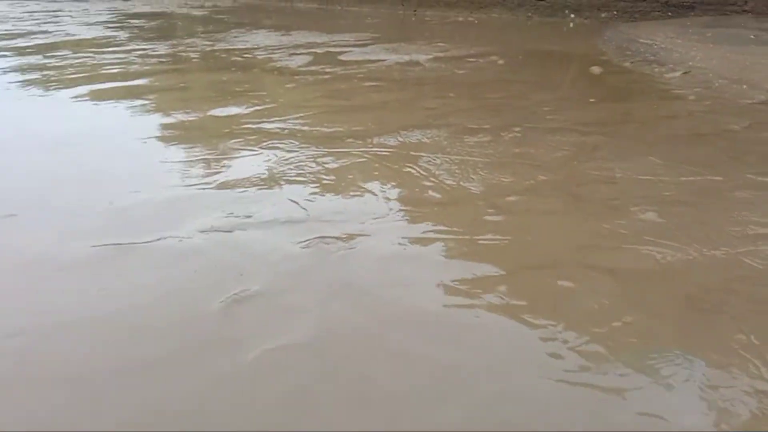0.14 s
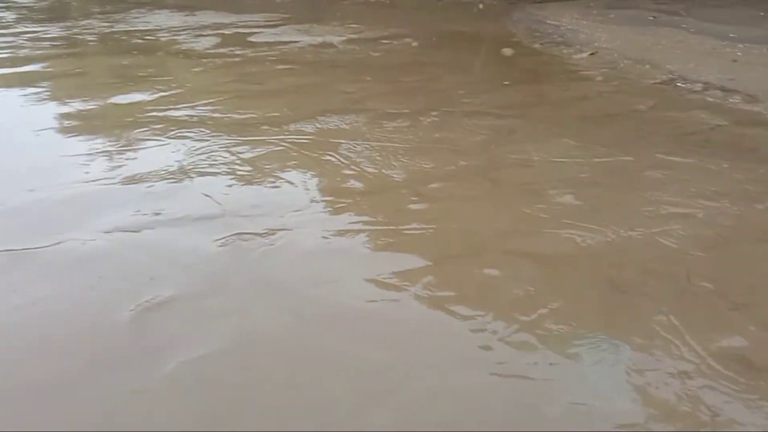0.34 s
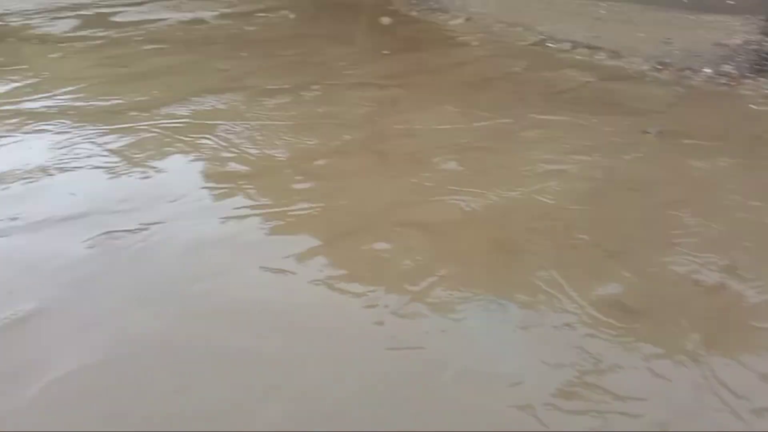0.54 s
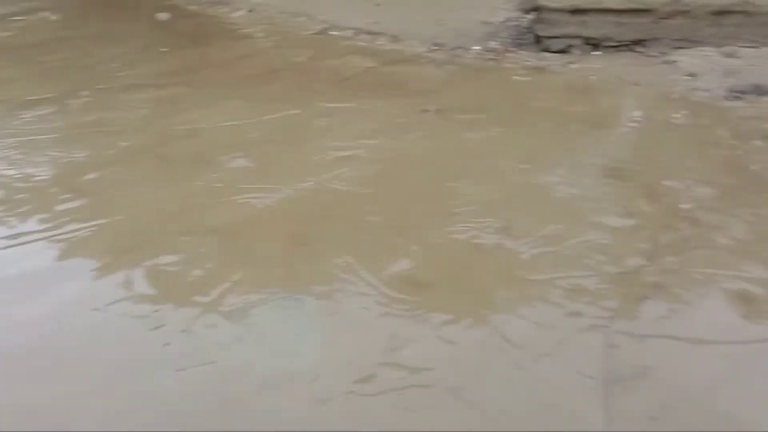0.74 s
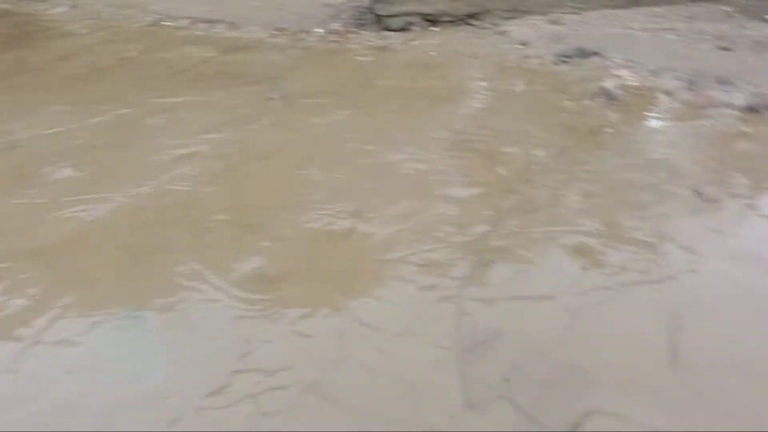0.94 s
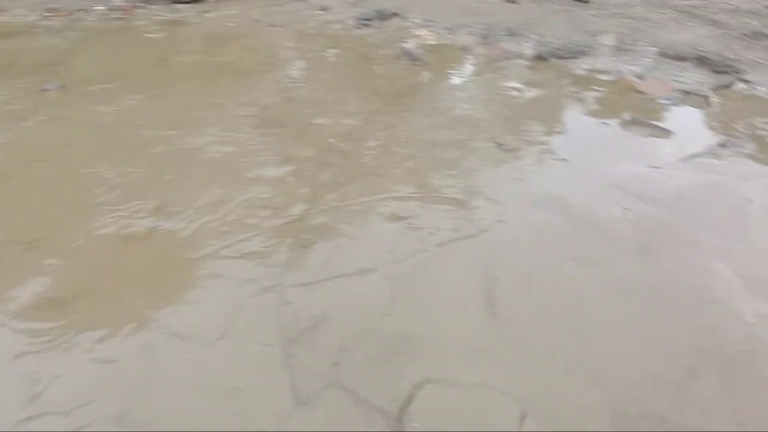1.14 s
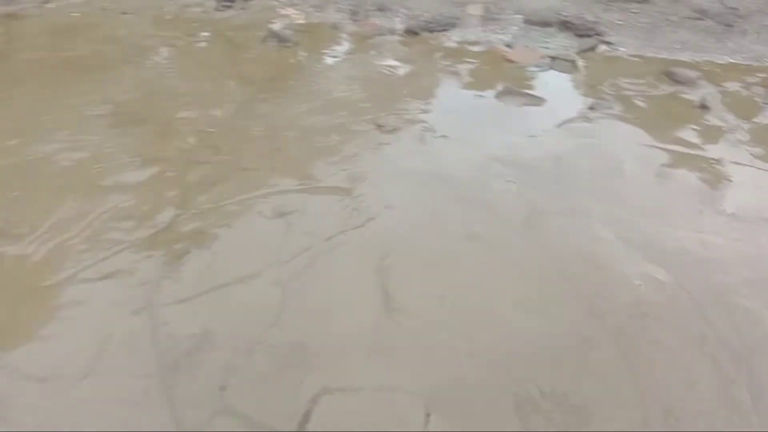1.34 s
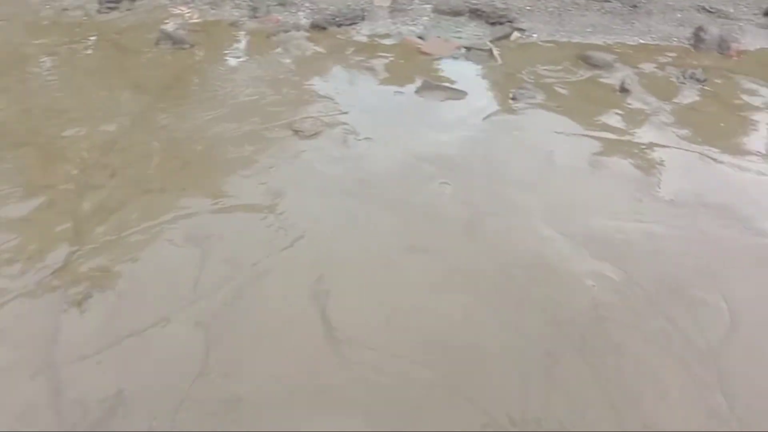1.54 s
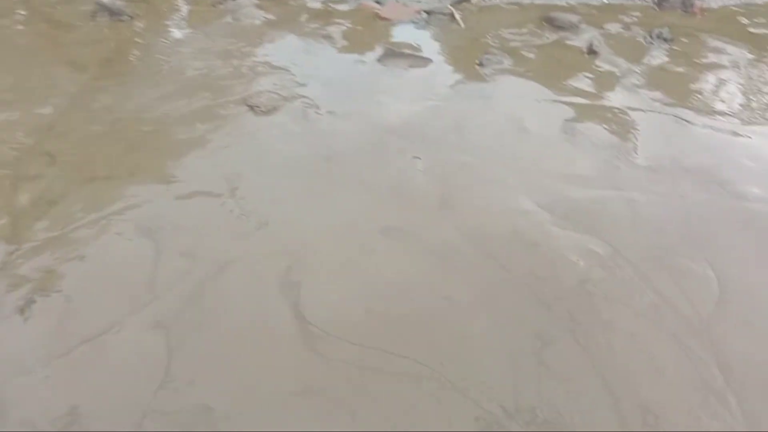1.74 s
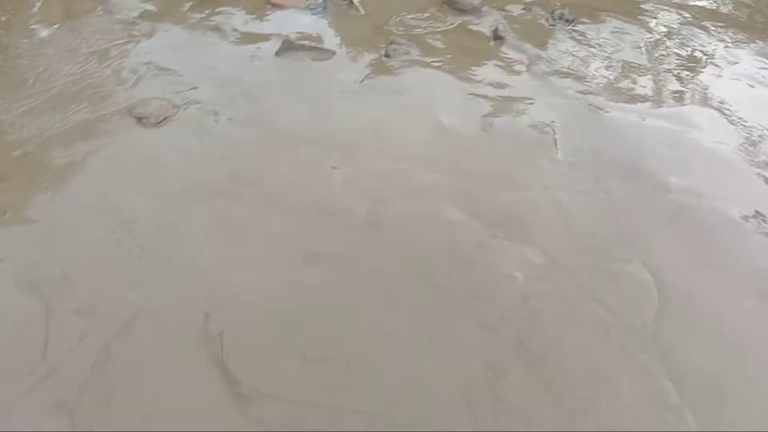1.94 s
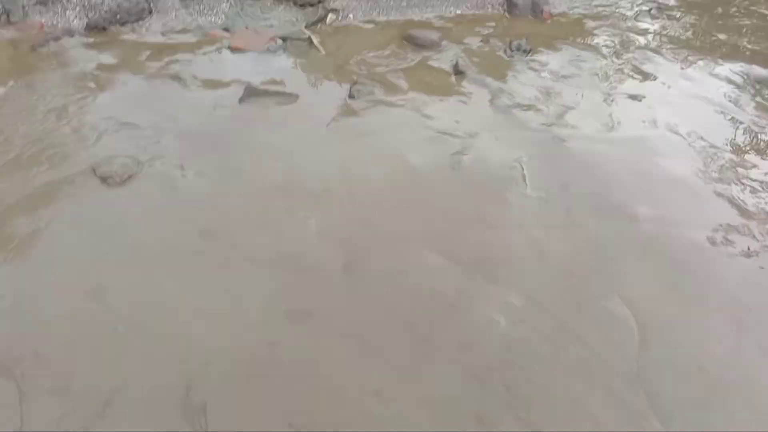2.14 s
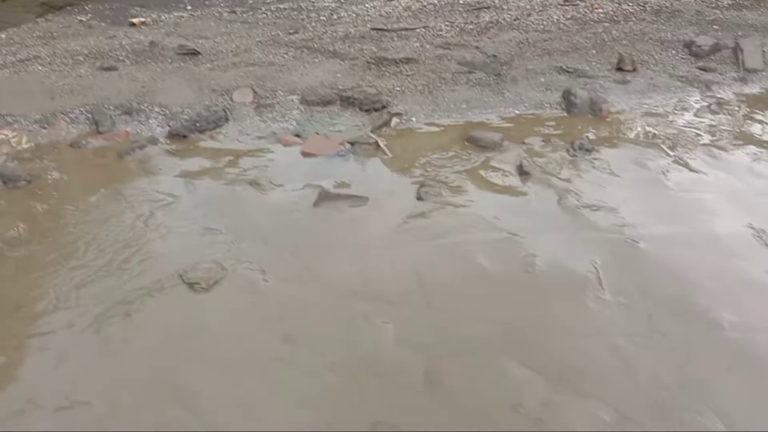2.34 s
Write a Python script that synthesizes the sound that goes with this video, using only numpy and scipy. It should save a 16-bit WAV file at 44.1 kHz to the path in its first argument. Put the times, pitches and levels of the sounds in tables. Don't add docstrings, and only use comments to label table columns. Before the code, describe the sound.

A footstep splashes and squelches through shallow muddy water while wind thumps the microphone

```python
import sys
import numpy as np
from scipy import signal
from scipy.fft import rfft, irfft
from scipy.io import wavfile
from scipy.ndimage import uniform_filter1d

SR = 44100
rng = np.random.default_rng(int(sys.argv[2]) if len(sys.argv) > 2 else 0)


def volts(x):
    e = np.asarray(x, float) / 20
    return 10 ** e


def materialize(psi):
    bounded = np.clip(np.atleast_2d(psi).T, -1, 1)
    quanta = np.round(bounded * 32767).astype(np.int16)
    wavfile.write(sys.argv[1], SR, quanta)


N = 110250


def evened(x):
    return x / np.sqrt(np.mean(x ** 2) + 1e-20)


def read(points, hz):
    f, value = np.transpose(points)
    return np.interp(np.log(hz + 1), np.log(f + 1), value)


def colour(x, points):
    size = len(x) + 4096
    gain = volts(read(points, np.fft.rfftfreq(size, 1 / SR)))
    return irfft(rfft(x, size) * gain, size)[:len(x)]


def add(mix, start_s, sound):
    part = mix[round(start_s * SR):][:len(sound)]
    part += sound[:len(part)]


def sparse(per_s, spread_db):
    chance, size, sign = rng.random((3, N))
    strength = volts(spread_db * np.minimum(-np.log(size + 1e-9), 3))
    return (chance < per_s / SR) * np.sign(sign - .5) * strength


def glide(hz, length_s, octaves, bend):
    u = np.arange(0, length_s, 1 / SR) / length_s
    pitch = hz * 2 ** (octaves * u ** bend)
    return np.sin(2 * np.pi * np.cumsum(pitch) / SR), u


def drift(size):
    return evened(uniform_filter1d(uniform_filter1d(rng.standard_normal(N), size), size))


def patchy(depth_db):
    z = signal.stft(rng.standard_normal(N + 512), nperseg=512, noverlap=384)[2]
    field = uniform_filter1d(rng.standard_normal(z.shape), size=3, axis=0)
    field = uniform_filter1d(field, size=14, axis=1)
    return evened(signal.istft(z * volts(depth_db * evened(field)), nperseg=512, noverlap=384)[1][:N])


# t/s, level/dB
WIND_STRENGTH = [(0, -46.5), (.09, -52.5), (.12, -38.5), (.27, -24), (.5, -19), (.78, -21), (.85, -27.5),
                 (.93, -17.5), (1.065, -21), (1.1, -38), (1.16, -23.5), (1.22, -42.5), (1.3, -22.5),
                 (1.35, -52), (1.97, -44), (2.03, -31.5), (2.14, -32), (2.17, -58)]
# f/Hz, level/dB
WIND_TONE = [(25, -59), (50, -19.5), (90, -1.5), (200, -5), (400, -21.5), (600, -44), (900, -94.5)]
EDDIES_PER_S, EDDY_SPREAD_DB, EDDY_DB = 450, -2, -1.5
CALM_DULL_DB = 2
STEADY, STEADY_S = 0.38, 0.016


def eddies():
    level_db = np.interp(np.arange(N) / SR, *np.transpose(WIND_STRENGTH))
    x = evened(colour(sparse(EDDIES_PER_S, EDDY_SPREAD_DB), WIND_TONE))
    span = round(STEADY_S * SR)
    power = uniform_filter1d(uniform_filter1d(x ** 2, span), span)
    x = evened(x / (power + 0.0089) ** (STEADY / 2))
    low = signal.filtfilt(*signal.butter(2, 170, fs=SR), x)
    dulling = volts(CALM_DULL_DB * (level_db - level_db.max()))
    return volts(level_db + EDDY_DB) * (low + (x - low) * dulling)


# t/s (centre), level/dB (peak), f/Hz
GUST_THUMPS = [(0.256, -17, 183), (0.417, -12, 191.5), (0.441, -9.5, 170), (0.502, -15, 198),
               (0.523, -11, 191), (0.736, -8.5, 158), (0.774, -15, 180), (0.93, -6, 163), (1.008, -11, 127),
               (1.041, -9.5, 117), (1.067, -11.5, 189), (1.287, -16, 157), (1.753, -26, 133),
               (1.868, -29.5, 152), (0.049, -39.5, 97), (0.594, -21, 190.7), (.687, -14.5, 130),
               (.968, -15, 150), (1.305, -20.5, 176), (2.028, -25, 139), (1.138, -18.5, 144)]
BUFFET_TURNS, BUFFET_LEAN = 0.94, 0.27


def add_buffets(air):
    t = np.arange(-800, 800) / SR
    for s, db, hz in GUST_THUMPS:
        hump = np.exp(-(t * hz / BUFFET_TURNS * 2) ** 2)
        thump = volts(db) * np.cos(2 * np.pi * (hz * t + BUFFET_LEAN))
        at = round(s * SR) - 800
        add(air, at / SR, hump * (thump - air[at:at + len(t)]))


# t/s (start), level/dB, f/Hz, length/s, rise/octaves
PORT_MOAN = (1.335, -51, 238, .165, .07)


def add_moan(air):
    s, db, hz, length, octaves = PORT_MOAN
    tone, u = glide(hz, length, octaves, 1)
    level = volts(db + 3.0 * drift(size=300)[:len(u)])
    add(air, s, level * tone * np.sin(np.pi * u) ** .3)


def wind():
    air = eddies()
    add_buffets(air)
    add_moan(air)
    return air


SWARM_PER_S, SWARM_SPREAD_DB, SWARM_DB = 2200, 4.5, 0.5
FIZZ_DB, CRACKLE_DB, CRACKLE_PER_S = -4, -3.5, 1100


def froth():
    swarm = np.zeros(N)
    for hz, (long, rise) in zip(np.geomspace(400, 9000, num=36), rng.random((36, 2))):
        tone, u = glide(hz, (9 + 22 * long) / hz + .004, .34 * rise * min(1, 1500 / hz), 1.3)
        grain = tone * np.sin(np.pi * u ** 0.88)
        grain = grain / np.linalg.norm(grain)
        swarm += np.sqrt(hz) * signal.oaconvolve(sparse(SWARM_PER_S / 36, SWARM_SPREAD_DB), grain)[:N]
    fizz = patchy(depth_db=6.0)
    bursts = signal.oaconvolve(sparse(CRACKLE_PER_S, 12.0), volts(-np.arange(60) / 2.))[:N]
    crackle = bursts * rng.standard_normal(N)
    return volts(SWARM_DB) * evened(swarm) + volts(FIZZ_DB) * evened(fizz) + volts(CRACKLE_DB) * evened(crackle)


# t/s (start), level/dB, f/Hz (centre), length/s
WATER_FOLDS = [(0.007, -63.5, 3350, 0.076), (0.112, -63.5, 3050, 0.29), (0.54, -68.5, 2070, 0.14),
               (0.657, -49, 1750, 0.086), (0.707, -57.5, 3510, 0.081), (0.768, -38, 1700, 0.034),
               (0.744, -44, 700, 0.065), (0.871, -41.5, 723, 0.11), (0.829, -34, 1570, 0.025),
               (0.838, -50, 3430, 0.053), (0.877, -44.5, 1480, 0.048), (0.95, -40.5, 1370, 0.063),
               (0.951, -64, 3980, 0.29), (1.086, -43.5, 1490, 0.076), (1.129, -45.5, 5040, 0.016),
               (1.199, -59.5, 2310, 0.047), (1.407, -63.5, 3270, 0.053), (1.487, -60, 2770, 0.059),
               (1.831, -46, 1300, 0.04), (1.836, -56.5, 4300, 0.052), (1.88, -60, 1630, 0.18),
               (1.826, -44.5, 486, 0.059), (2.381, -63.5, 3780, 0.066), (2.134, -56, 2720, 0.097),
               (2.267, -58.5, 2220, 0.074), (2.316, -53, 1040, 0.086), (2.403, -53, 1290, 0.33)]
SLOSH_OCTAVES, SLOSH_RISE_S, SLOSH_FADE_DB = 0.46, 0.01, -4.5
SHEEN_DB = -32


def sloshes():
    foam = froth()
    water = np.zeros(N)
    for s, db, hz, length in WATER_FOLDS:
        part = foam[round(s * SR):][:round(2 * length * SR)]
        t, f = np.arange(len(part)) / SR, np.fft.rfftfreq(len(part), 1 / SR)
        band = np.exp(-(np.log2((f + 1) / hz) / SLOSH_OCTAVES) ** 2 / 2)
        sheen = volts(SHEEN_DB + read(SPRAY_TONE, f)) * (hz / 3000) ** 2
        sound = irfft(rfft(part) * (band + sheen), len(part))
        rise = np.minimum(t / SLOSH_RISE_S, 1) ** 2
        add(water, s, evened(sound) * rise * volts(db + SLOSH_FADE_DB * (t / length) ** 3))
    return water


# t/s (start), level/dB (peak), f/Hz, length/s
FALLING_DRIPS = [(0.264, -42.5, 2156, 0.018), (0.743, -36, 3620, 0.0063), (.92, -27.5, 1915, 0.0038),
                 (1.005, -40, 4000, 0.0061), (1.018, -36, 3100, 0.0037), (1.068, -42.5, 2960, 0.02),
                 (1.314, -45.5, 1700, 0.014), (1.181, -35.5, 3200, 0.0046), (1.237, -30.5, 4480, 0.0036),
                 (1.432, -21.5, 1062, 0.01), (1.751, -40, 2063, 0.0081), (1.788, -34.5, 1304, 0.017),
                 (1.82, -40.5, 2590, 0.0088), (1.845, -25, 950, 0.0031), (1.859, -32.5, 1290, 0.0054),
                 (1.878, -39, 2730, 0.0061), (1.9, -31, 670, 0.007), (1.925, -49.5, 1660, 0.022),
                 (1.959, -35.5, 1068, 0.0068), (2.049, -55.5, 2106, 0.034), (2.061, -43.5, 781, 0.026),
                 (2.152, -24.5, 2454, 0.0038), (2.268, -44, 1840, 0.0085), (2.28, -40, 2970, 0.0073),
                 (2.44, -38, 1445, 0.0097), (.694, -47, 2600, .006), (0.704, -46.5, 6500, 0.0036),
                 (0.764, -36.5, 3700, 0.0032), (.783, -46, 7100, 0.0032), (.838, -37.5, 4180, 0.0031),
                 (0.873, -52, 5270, 0.0036), (0.948, -48, 5220, 0.0055), (.956, -40, 4140, 0.0055),
                 (.956, -38.5, 2640, .005), (0.995, -42.5, 4320, .005), (1.11, -35.5, 4040, 0.0026),
                 (1.11, -35.5, 2770, 0.0038), (1.16, -37.5, 2220, 0.0061), (1.213, -41.5, 1820, 0.0036),
                 (1.829, -42, 2100, 0.0071), (1.842, -36, 3590, 0.0048), (1.836, -46, 6900, .003),
                 (1.861, -40.5, 3380, 0.0036), (1.862, -43, 7140, 0.0042), (1.863, -49, 5280, 0.0035),
                 (1.909, -51, 2540, 0.011), (2.073, -53.5, 3620, 0.028), (2.147, -39, 3240, 0.0025),
                 (2.185, -50, 2280, 0.0042), (2.21, -39.5, 2120, 0.0048)]
SLAP = .035
DRIP_RISE, DRIP_PEAK_AT, DRIP_FADE = .08, .42, 1.5


def drips(wobble):
    out = np.zeros(N)
    for s, db, hz, length in FALLING_DRIPS:
        tone, u = glide(hz, length * 1.068, DRIP_RISE, 0.56)
        v = u ** (np.log(.5) / np.log(DRIP_PEAK_AT))
        ring = tone * abs(np.sin(np.pi * v)) ** DRIP_FADE
        slap = SLAP * rng.standard_normal(len(u)) * np.exp(-u / .15)
        add(out, s, volts(db) * (ring + np.convolve(slap, np.hanning(8) / 2, "same")))
    return out * np.sqrt(wobble)


# t/s (start), level/dB (peak), f/Hz (start), length/s, rise/octaves
MUD_POCKETS = [ (.75, -35.5, 1343, 0.018, 0.17), (0.788, -33, 1020, 0.021, 0.83),
               (.895, -33, 450, .045, .9), (1.072, -44.5, 1070, 0.034, 0.3),
               (1.104, -35.5, 1374, 0.014, 0.74), (1.316, -36.5, 2200, 0.011, 0.72),
               (2.183, -36, 497, 0.047, 0.34), (2.278, -46.5, 651, 0.033, 0.2),
               (2.28, -48.5, 888, 0.033, 0.21), (2.3, -53, 400, .045, .3), (2.356, -49, 600, .043, 1.2),
               (2.408, -37, 429.7, 0.066, 1.02), (2.425, -43.5, 419.7, 0.084, 0.86),
               (2.438, -39.5, 927, 0.017, 0.091), (2.453, -41, 1144, 0.042, 0.57),
               (2.466, -37, 628, 0.037, 0.87), (.665, -46, 1920, 0.036, 0.1),
               (0.817, -40.5, 2200, 0.0091, 0.37), (.826, -36, 1543, 0.012, 0.22),
               (0.844, -38, 1520, 0.012, 0.81), (0.859, -37, 1476, 0.019, 0.75),
               (0.884, -36, 1330, 0.0092, 0.03), (0.961, -46, 1660, .018, -0.038),
               (0.977, -37, 1290, 0.012, .25), (1.016, -38, 1870, 0.0085, 0.38),
               (1.022, -38, 3260, 0.0068, 0.83), (1.852, -53, 5000, .011, .4),
               (1.932, -59, 3830, .04, -.02), (2.205, -50.5, 1625, .03, -0.21),
               (2.412, -41, 1030, 0.011, 0.33), (0.038, -61, 1520, .022, 0.23)]
GURGLE_BEND, GURGLE_RISE_S, GURGLE_FALL_S = 1.4, .0015, .005


def gurgles(wobble):
    mud = np.zeros(N)
    for s, db, hz, length, octaves in MUD_POCKETS:
        tone, u = glide(hz, length, octaves, GURGLE_BEND)
        rise = np.minimum(u * length / GURGLE_RISE_S, 1)
        fall = np.minimum((1 - u) * length / GURGLE_FALL_S, 1)
        add(mud, s, volts(db - 1.0 * u) * tone * rise * fall)
    return mud * wobble


# t/s, level/dB (peak)
DROPLETS = [(0.066, -44), (0.7193, -47), (0.78, -36), (0.834, -45), (0.8658, -54), (0.8884, -35.5),
            (0.9425, -33), (0.9937, -32.5), (1.013, -28), (1.059, -38), (1.0912, -36), (1.16, -27.5),
            (1.2, -44), (1.2333, -33.5), (1.5313, -46.5), (1.842, -46), (1.88, -46), (1.975, -55),
            (2.065, -51), (2.083, -58), (1.139, -37.5), (1.148, -47), (1.119, -40), (.76, -48), (0.85, -51),
            (2.392, -54), (2.42, -55), (1.9353, -39.5), (2.189, -38), (2.2042, -45), (2.2205, -34),
            (2.2782, -43.5), (2.3447, -40), (2.4089, -52.5)]
# f/Hz, level/dB
SPRAY_TONE = [(2000, 2.5), (4500, -33.5), (7500, 9), (8700, -22), (10000, -8.5), (12500, 9.5), (15200, 17),
              (15900, -19.5)]
TICK_T60, TICK_DB = 0.0057, -5
MIST_MID_S, MIST_WIDTH_S, MIST_DB, MIST_PER_S = 1.198, 0.18, -62.5, 960


def spray():
    ticks, t = np.zeros(N), np.arange(1500) / SR
    for (s, db), puff in zip(DROPLETS, rng.standard_normal((len(DROPLETS), 1500))):
        add(ticks, s, volts(db + TICK_DB - 60 * t / TICK_T60) * np.minimum(t / 0.0012, 1) * puff)
    hump = np.exp(-((np.arange(N) / SR - MIST_MID_S) / MIST_WIDTH_S) ** 2)
    puffs = signal.oaconvolve(sparse(MIST_PER_S, 9.6), np.hanning(130))[:N]
    mist = evened(puffs * rng.standard_normal(N))
    body = signal.lfilter(*signal.butter(2, [2500, 7500], "band", fs=SR), ticks)
    return colour(ticks + volts(MIST_DB) * hump * mist, SPRAY_TONE) + volts(4.5) * body


ECHO_DB, ECHO_T60 = -13, .07


def shore(x):
    t = np.arange(6000) / SR
    tail = rng.standard_normal(6000) * volts(-60 * t / ECHO_T60) * np.minimum(t / 0.0073, 1)
    return x + volts(ECHO_DB) * signal.oaconvolve(x, tail / np.linalg.norm(tail))[:N]


# t/s (start), level/dB, f/Hz (start), length/s, slide/octaves
BIRD_CALLS = [
    (1.568, -67, 7700, .16, -.09),
    (2.105, -68, 7850, .05, -.08),
]


def bird():
    out = np.zeros(N)
    for s, db, hz, length, octaves in BIRD_CALLS:
        tone, u = glide(hz, length, octaves, 1)
        blur = 1 + .8 * drift(size=70)[:len(u)]
        add(out, s, volts(db) * tone * blur * np.minimum(u / .1, 1) * (1 - u))
    return out


# f/Hz, level/dB
HUSH_TONE = [(24, -42), (40, -9), (121, -1), (433, -27.5), (2700, -24), (5050, -48), (7360, -30.5),
             (9220, -53.5), (16000, -58)]
HUSH_DB = -60


def hush():
    swell_db = 1.5 * drift(size=3000)
    return volts(HUSH_DB + swell_db) * evened(colour(patchy(depth_db=4.0), HUSH_TONE))


def scene():
    wobble = volts(2.4 * drift(size=150))
    water = sloshes() + drips(wobble) + gurgles(wobble) + spray()
    return (wind() + shore(water) + bird() + hush())[None]


def top_cut(x):
    return signal.sosfilt(signal.butter(12, 16830, fs=SR, output="sos"), x)


def record(dry):
    x = signal.lfilter(*signal.butter(3, 50, "high", fs=SR), dry)
    return top_cut(0.68 * np.tanh(x / 0.68))


dry = scene()
out = record(dry)
materialize(out)
```